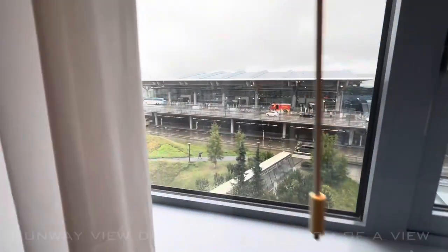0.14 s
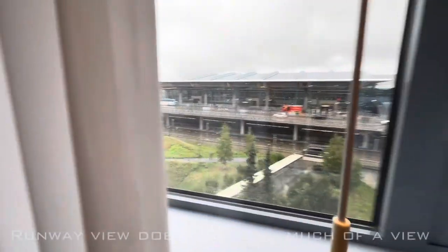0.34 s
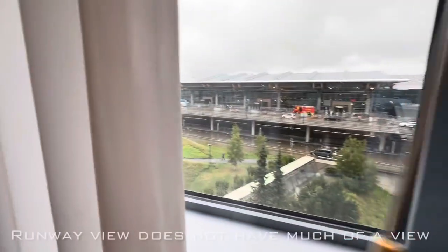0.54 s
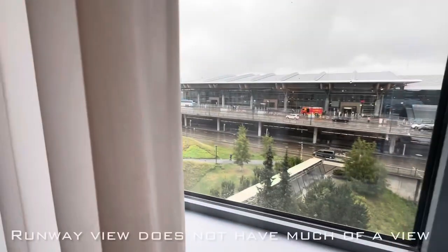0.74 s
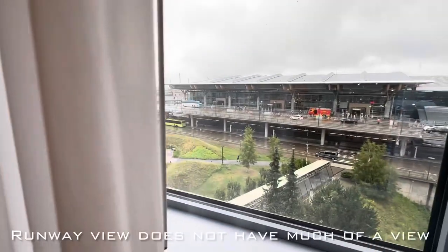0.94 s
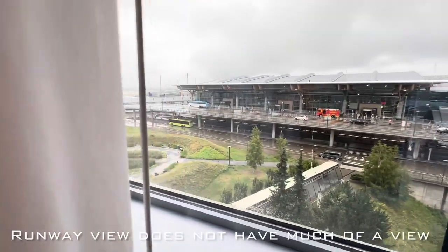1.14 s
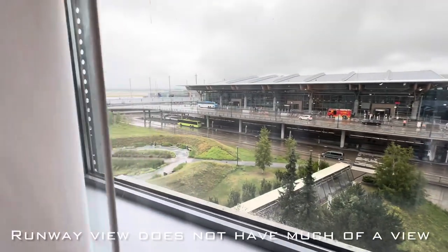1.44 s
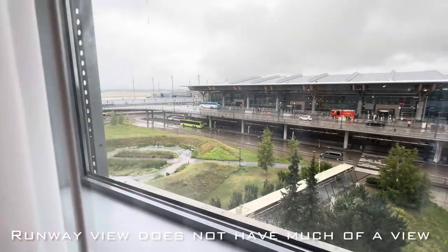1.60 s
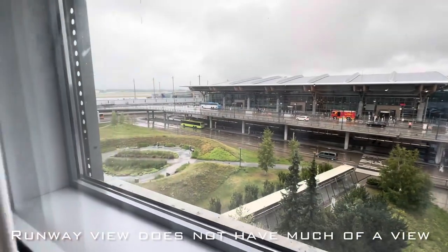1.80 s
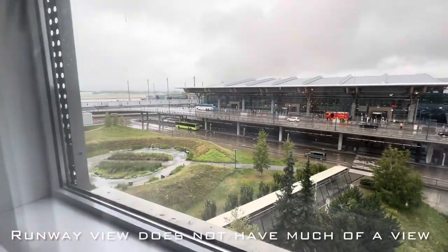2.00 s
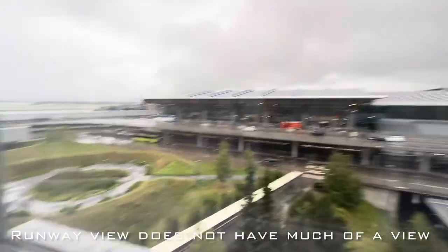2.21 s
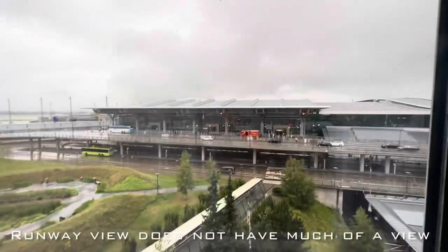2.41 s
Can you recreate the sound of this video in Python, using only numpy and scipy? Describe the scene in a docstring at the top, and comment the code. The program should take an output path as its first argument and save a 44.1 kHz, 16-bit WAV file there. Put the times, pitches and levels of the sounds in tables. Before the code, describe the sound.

Curtain runners hiss and squeal along a rail, tick together and bunch up with a sharp wand clack and cloth rustle, then a heavy low thud on the window pane, heard close indoors over soft ventilation hum.

```python
"""A small, quiet room: a curtain is drawn open by its wand.
The runners scrape along a ringing track (filtered slip noise), squeal, then tick as they bunch up.
The wand clacks against the end of the window recess (noise bursts and damped modes).
It bumps the window, once hard: a falling bending wave, and the big pane's modes boom.
Cloth rustles as patchy noise; ventilation hums underneath as noise and two low tones."""
import sys
import numpy as np
from scipy import signal
from scipy.fft import rfft, irfft, next_fast_len
from scipy.io import wavfile
from scipy.ndimage import uniform_filter1d, map_coordinates

SR = 44100
rng = np.random.default_rng(int(sys.argv[2]) if len(sys.argv) > 2 else 0)


def int16_out(signal):
    """Quantize to a 16-bit WAV file."""
    q = np.round(np.clip(np.atleast_2d(signal).T, -1, 1) * 32767)
    wavfile.write(sys.argv[1], SR, q.astype(np.int16))


N = 112454
T = np.arange(SR // 2) / SR  # time axis of one event, s
TIME_S = np.arange(N) / SR
MODE_SCATTER_DB = 2


def amp(db):
    """Decibels to gain."""
    return 10 ** (np.asarray(db) / 20)


def unit(x):
    """Scale to rms 1."""
    return x / np.sqrt(np.mean(x ** 2) + 1e-20)


def decay(t60_s):
    """Exponential decay, 60 dB in t60_s."""
    return amp(-60 * T / t60_s)


def onset(rise_s):
    """Exponential rise towards 1 with time constant rise_s."""
    return 1 - np.exp(-T / rise_s)


def along(points, hz):
    """Interpolate (hz, value) points on a log frequency axis."""
    f, v = np.transpose(points)
    return np.interp(np.log(hz + 1), np.log(f + 1), v)


def curves(rows):
    """One value per sample for each column after the time."""
    s, *cols = np.transpose(rows)
    return [np.interp(TIME_S, s, c) for c in cols]


def wobble(rate_hz):
    """Smooth random curve through rate_hz knots a second."""
    knots = rng.standard_normal(int(N * rate_hz / SR) + 4)
    return map_coordinates(knots, [np.arange(N) * rate_hz / SR])


def filtered(x, response):
    """Multiply the spectrum of x by a complex response of frequency."""
    n = x.shape[-1]
    m = next_fast_len(n + 8192)
    return irfft(rfft(x, m) * response(np.fft.rfftfreq(m, 1 / SR)), m)[..., :n]


def coloured(x, points, tilt_db=0):
    """Minimum-phase colour of unit energy, tilted in dB per octave."""
    size = 4096
    hz = np.fft.rfftfreq(size, 1 / SR)
    level_db = along(points, hz) + tilt_db * np.log2(1 + hz / 700)
    cepstrum = irfft(np.log(amp(level_db)))
    cepstrum[1:size // 2] *= 2  # fold to make it causal
    cepstrum[size // 2 + 1:] = 0
    h = irfft(np.exp(rfft(cepstrum)))
    return signal.fftconvolve(x, h[None] / np.linalg.norm(h), axes=1)[:, :x.shape[1]]


def pair(size, alike):
    """Two white noises with a given correlation."""
    a, b = rng.standard_normal((2, size))
    u = np.arccos(np.clip(alike, -1, 1)) / 2
    return np.array([np.cos(u) * a + np.sin(u) * b, np.cos(u) * a - np.sin(u) * b])


def add(out, x, start_s, right_db=0, lead_s=0):
    """Place a stereo event, its right side louder by right_db and earlier by lead_s."""
    for ch, side in enumerate((-1, 1)):
        i = max(0, round((start_s - side * lead_s / 2) * SR))
        out[ch, i:i + x.shape[1]] += amp(side * right_db / 2) * x[ch, :N - i]


def ring(modes, scatter_db):
    """Sum damped modes, each of random strength on either side."""
    out = np.zeros((2, len(T)))
    for hz, level_db, t60_s in modes:
        level_lr_db = level_db + scatter_db * rng.standard_normal((2, 1))
        out += amp(level_lr_db) * decay(t60_s) * np.sin(2 * np.pi * hz * T)
    return out


def slips(rate_hz, spread_db, alike):
    """Friction: a dense random train of tiny slips of uneven size."""
    happens = rng.random(N) < rate_hz / SR
    size = amp(spread_db * np.minimum(rng.exponential(size=N), 4))
    return unit(happens * size * pair(N, alike))


def recess(x, walls_db):
    """Close walls return seven weak copies a side, which comb the sound."""
    out = x.copy()
    for ch in range(2):
        for delay_s, sign in zip(rng.uniform(.001, .009, size=7), rng.choice([-1, 1], size=7)):
            i = round(delay_s * SR)
            out[ch, i:] += sign * amp(walls_db) * x[ch, :N - i]
    return out / np.sqrt(1 + 7 * amp(walls_db) ** 2)


def patchy(x, depth_db):
    """Let the colour drift in patches of time and frequency."""
    z = signal.stft(x, nperseg=512)[2]
    field = uniform_filter1d(rng.standard_normal(z.shape[1:]), 6, 0)
    field = uniform_filter1d(field, 16, 1)
    return signal.istft(z * amp(depth_db * unit(field)), nperseg=512)[1][:, :N]


def panned(x, points):
    """Share each frequency between left and right."""
    return filtered(x, lambda f: amp(along(points, f) * np.array([[.5], [-.5]])))


# room decay: hz, t60_s
ROOM_DECAY = [(100, 1), (400, 0.3), (1500, 0.15), (5000, 0.18), (14000, 0.3)]


def room(x, wet_db):
    """Add the room's noise tail, each frequency dying at its own speed."""
    hz, t, z = signal.stft(pair(len(T), 0.93), SR, nperseg=256)
    z = z * amp(-60 * t / along(ROOM_DECAY, hz)[:, None])
    tail = signal.istft(z, SR, nperseg=256)[1][:, :len(T)] * onset(0.02)
    tail /= np.linalg.norm(tail[0])
    return x + amp(wet_db) * signal.fftconvolve(x, tail, axes=1)[:, :N]


# air noise spectrum, relative: hz, level_db_per_hz
AIR_COLOUR = [(12, -35), (20, -26), (55, 2), (154, -11.5), (270, -18), (320, -19.5), (370, -23.5),
              (472, -24.5), (560, -28.5), (1090, -31.5), (2300, -39.5), (3070, -41.5), (4810, -52),
              (7310, -54), (9950, -43.5), (12000, -58), (16000, -66)]
# air noise left-right likeness: hz, correlation (0 to 1)
AIR_LIKENESS = [(60, 1), (250, 0.83), (600, 0.043), (2000, 0.18)]
AIR_DB, HUM_HZ, HUM_DB, DRONE_HZ, DRONE_DB = -53, 300.5, -62.5, 66.5, -64


def ventilation():
    """Steady coloured air noise, a fan tone and a low drone, both wavering in level and phase."""
    def mid_side(f):
        turn = np.arccos(np.clip(along(AIR_LIKENESS, f), -1, 1)) / 2
        return amp(along(AIR_COLOUR, f)) * np.array([np.cos(turn), np.sin(turn)])

    mid, side = filtered(pair(N, 0), mid_side)
    air = amp(AIR_DB) * unit(np.array([mid + side, mid - side]))
    hum = unit(np.sin(2 * np.pi * HUM_HZ * TIME_S + wobble(15) / 10))
    hum *= amp(HUM_DB + wobble(3.3))
    drone = unit(np.sin(2 * np.pi * DRONE_HZ * TIME_S + 0.12 * wobble(10.6)))
    drone *= amp(DRONE_DB + 1.7 * wobble(6.2))
    return air + hum + drone


# cloth gathering and swaying: time_s, level_db (before +1.5 dB)
CLOTH_LEVEL = [(1.05, -74), (1.24, -75), (1.29, -69), (1.33, -43.5), (1.38, -50), (1.47, -57.5),
               (1.555, -49), (1.585, -61), (1.66, -61.5), (1.75, -67.5), (1.83, -56), (1.93, -69),
               (2.06, -67.5), (2.12, -68.5), (2.16, -59), (2.23, -63), (2.27, -57.5), (2.36, -63),
               (2.45, -73), (2.51, -63.5), (2.55, -70)]
# cloth spectrum, relative: hz, level_db_per_hz
CLOTH_SPECTRUM = [(200, -17.5), (600, 20.5), (1100, 7.5), (1550, 17.5), (2400, 4), (3300, -14.5),
                  (5000, -3.5), (8000, -27), (14000, -23)]
# cloth balance: hz, left_minus_right_db
CLOTH_BALANCE = [(600, 2.5), (1500, 1.5), (3000, 19), (5000, 15.5), (12000, -6)]


def cloth():
    """Folds rustle as they gather and sway: slip noise with drifting colour."""
    level_db, = curves(CLOTH_LEVEL)
    rustle = panned(coloured(slips(5000, 1.2, 0.067), CLOTH_SPECTRUM), CLOTH_BALANCE)
    return patchy(rustle, 2.14) * amp(level_db + 1.5 + wobble(36.37))


# brush spectrum, relative: hz, level_db_per_hz
BRUSH_SPECTRUM = [(2000, -13), (2900, 3), (3800, 6), (5500, -23)]
# balance of brush and sliding hiss: hz, left_minus_right_db
HISS_BALANCE = [(1500, 11), (2400, 6.5), (4400, 12), (8000, 1), (15000, -4.5)]
BRUSH_PEAK_S, BRUSH_HALF_WIDTH_S, BRUSH_DB = 0.579, 0.046, -45  # half width at 1/e


def brush():
    """One fold brushes past: a brief, gritty swell of slips."""
    swell = np.exp(-((TIME_S - BRUSH_PEAK_S) / BRUSH_HALF_WIDTH_S) ** 2)
    grit = unit(panned(coloured(slips(2000, 1, 0), BRUSH_SPECTRUM), HISS_BALANCE))
    return amp(BRUSH_DB) * swell * grit


# bumps: start_s, bend_db, bend_t60_s, crack_db, pane_db, pane_tilt_db_per_octave,
# right_minus_left_db, right_lead_s (each layer scales the last two)
WINDOW_BUMPS = [(1.306, -22.5, 0.053, -52, -45.5, 3.5, 4, .0003),
                (2.1427, 0.5, 0.059, -5.5, -27.5, 4.5, 10.5, .0005),
                (2.327, -24, 0.21, -29.5, -40.5, -0.5, -7.5, -.0005)]
# pane modes: hz, level_db, t60_s
PANE_MODES = [(56.8, -13, 0.87), (64.6, 5, 0.71), (81.7, 12, .18), (130.6, 5, 0.21), (175.7, 1.5, .3),
              (205.5, 1.5, 0.16), (265, -3, 0.26), (308, -6, 0.234), (370.4, -5, 0.18)]
# window frame modes: hz, level_db, t60_s
FRAME_MODES = [(915, -4.5, 0.013), (1210, -1, 0.0036), (2450, -5, 0.0076)]
# crack spectrum, relative: hz, level_db_per_hz
CRACK_SPECTRUM = [(100, -29.5), (500, 5.5), (700, 0), (1100, 7), (1700, -6), (2350, -3), (3000, -10.5),
                  (4000, -21.5), (6000, -21), (9500, -18), (12000, -27), (15500, -46)]
BEND_HZ, BEND_FALL_S, BEND_RISE_S, BEND_TOP_HZ = 1460, 0.000877, 0.0028, 428
FRAME_DB = -3.5
PANE_BLUR_RAD_PER_HZ = .0035  # phase unsteadiness


def pane_boom(tilt_db, anchor_hz):
    """Damped pane modes with unsteady phase; higher modes build up faster."""
    out = np.zeros(len(T))
    for hz, level_db, t60_s in PANE_MODES:
        blur = PANE_BLUR_RAD_PER_HZ * hz * wobble(51.4)[:len(T)]
        level = amp(level_db + tilt_db * np.log2(hz / anchor_hz))
        out += level * decay(t60_s) * onset(2.9 / hz) * np.sin(2 * np.pi * hz * T + blur)
    return out


def bumps():
    """Window knock: the frame cracks, a bending wave falls in pitch, treble first, and the pane booms."""
    knock, boom = np.zeros((2, 2, N))
    anchor_hz = PANE_MODES[1][0]  # the bending wave settles on this mode
    bend_hz = np.hypot(BEND_HZ / (1 + T / BEND_FALL_S), anchor_hz * onset(0.039))
    phase = 2 * np.pi * np.cumsum(bend_hz) / SR
    band = signal.butter(3, [30, BEND_TOP_HZ], "band", fs=SR, output="sos")
    for start_s, bend_db, bend_t60_s, crack_db, pane_db, tilt_db, right_db, lead_s in WINDOW_BUMPS:
        crack_decay = decay(0.013) + amp(-25) * decay(0.039)
        crack = coloured(pair(len(T), 0.085) * crack_decay, CRACK_SPECTRUM)
        crack = (crack + amp(FRAME_DB) * ring(FRAME_MODES, MODE_SCATTER_DB)) / 2
        add(knock, amp(crack_db) * crack, start_s, 0.38 * right_db, lead_s)

        # soft touch just before the blow
        touch = coloured(pair(len(T), 0.29) * decay(0.098), CRACK_SPECTRUM, -6)
        add(knock, amp(crack_db - 24.5) * touch, start_s - .007)

        bend = np.cos(phase) * onset(BEND_RISE_S) * decay(bend_t60_s)
        bend = signal.sosfilt(band, bend)
        add(boom, amp(bend_db) * np.array([bend, bend]), start_s, right_db, 3.2 * lead_s)

        pane = pane_boom(tilt_db, anchor_hz)
        add(boom, amp(pane_db) * np.array([pane, pane]), start_s, 0.22 * right_db, 1.25 * lead_s)
    return room(knock, -22.5) + boom


# wand clacks, and last a faint cloth swell at 2.263 s: start_s, level_db, tilt_db_per_octave
CLACKS_AND_SWELL = [(1.3052, -14, 3.5), (1.3075, -13, 1), (1.3107, -14, -2.5), (1.334, -32, 8.5),
                    (1.496, -24.5, -0.5), (1.5023, -26.5, -5), (1.532, -27.5, -3), (1.542, -31, -4.5),
                    (1.554, -31, -6.5), (1.568, -35, -7.5), (1.5956, -25.5, -4.5), (1.617, -38, -13),
                    (1.775, -36.5, -6.5), (1.811, -36.5, -4), (1.852, -38.5, -14.5), (2.263, -48, 2.5)]
# clack spectrum, relative: hz, level_db_per_hz
CLACK_SPECTRUM = [(40, -34), (100, -3), (240, 4.5), (390, 3.5), (560, 2), (800, 3.5), (1250, 11),
                  (1850, -5.5), (2350, -7), (3150, -1.5), (3900, -13.5), (5000, -9), (7000, -18),
                  (10000, -15.5), (15000, -48)]
# clack balance: hz, left_minus_right_db
CLACK_BALANCE = [(200, -2.5), (550, -3), (1200, -5), (2400, 3), (3500, 4.5), (5000, 8), (10000, -9)]
# wand modes: hz, level_db, t60_s
WAND_MODES = [(236, -10.5, 0.16), (401.4, -4.5, 0.079), (820, -12, 0.064), (1140, -12, .03),
              (1392, -7, 0.12), (1570, -3, 0.065), (2165, -6, 0.042), (2329, 2.5, 0.034), (3058, 3, 0.039),
              (3326, -4, 0.065), (3680, -25, 0.021), (4460, -16, 0.094), (5050, -15, 0.057)]
CLACK_T60_S, CLACK_RING_DB = 0.027, -14


def clacks_and_swell():
    """Wand and runner clatter on end stop and wall, duller at negative tilt; last a faint cloth swell."""
    out = np.zeros((2, N))
    for start_s, level_db, tilt_db in CLACKS_AND_SWELL:
        burst = coloured(pair(len(T), 0.62) * decay(CLACK_T60_S), CLACK_SPECTRUM, tilt_db)
        dulling_db = np.minimum(tilt_db, 0)
        modes = [(hz, mode_db + dulling_db * np.log2(1 + (hz / 2000) ** 2), t60_s)
                 for hz, mode_db, t60_s in WAND_MODES]
        event = burst + amp(CLACK_RING_DB) * ring(modes, MODE_SCATTER_DB)
        add(out, amp(level_db) * event * onset(0.0014), start_s, lead_s=0.000468)
    return room(panned(recess(out, -16.5), CLACK_BALANCE), -11)


# runner ticks: start_s, level_db (before +1.5 dB), left_minus_right_db, tilt_db_per_octave,
# rattle_t60_s, ping_hz
RUNNER_TICKS = [(0.67, -39.5, -5, 28, 0.058, 12900), (0.733, -44.5, 4, -6, 0.032, 6900),
                (0.78, -40.5, 11.5, -12.5, 0.022, 4830), (0.931, -49.5, 15, -23.5, 0.011, 4820),
                (1.0748, -43, 2, 4, 0.089, 9400), (1.089, -45.5, 10, -12.5, 0.12, 5300),
                (1.1426, -41, 6.5, -6.5, 0.018, 7600), (1.2773, -56.5, 1, 3, 0.069, 8500),
                (1.3075, -38, 11, 4, 0.1, 10600), (1.37, -30.5, 1, 4, 0.019, 10000),
                (1.376, -36.5, -9.5, 6, 0.02, 9800), (1.387, -30, 12.5, -1, 0.011, 9570),
                (1.399, -34, 0, -4, 0.036, 6600), (1.4141, -29.5, 7.5, 0.5, 0.014, 7820),
                (1.4247, -30.5, 6.5, -6.5, .011, 7760), (1.445, -42, -1, -1, 0.018, 9440),
                (1.467, -43, -1, 2, 0.012, 8250), (1.496, -33, 4.5, -15.5, 0.033, 5420),
                (1.674, -47.5, 2.5, -2.5, 0.053, 7770), (1.701, -60, 13, -6, 0.044, 9400),
                (2.17, -51.5, -13, -23, 0.013, 9200), (2.208, -57.5, -8, 5, 0.013, 8370)]
# tick spectrum, relative: hz, level_db_per_hz
TICK_SPECTRUM = [(500, -41), (2000, -10), (3800, -4.5), (5200, 8.5), (7000, 5.5), (9500, 6), (11000, -2.5),
                 (12000, -10), (15000, -18), (16500, -50)]
# runner modes: hz, level_db, t60_s
RUNNER_MODES = [(4460, -4, .035), (4700, -12, .025), (5150, 1.5, .035), (5400, -11, 0.049),
                (5960, -20, 0.035), (7860, -11, 0.042), (9240, -18, 0.026), (11200, -11, 0.028)]
PING_T60_S = 0.012
RUNNER_SPREAD = 0.0073  # relative pitch scatter of each mode


def ticks():
    """Runners hit one another: a short rattle, a brief ping and a thin ring."""
    out = np.zeros((2, N))
    for start_s, level_db, left_db, tilt_db, t60_s, ping_hz in RUNNER_TICKS:
        rattle = coloured(pair(len(T), 0.078) * decay(t60_s), TICK_SPECTRUM, tilt_db)
        ping_phase = rng.uniform(0, np.pi, (2, 1))
        ping = amp(2.0) * decay(PING_T60_S) * np.sin(2 * np.pi * ping_hz * T + ping_phase)
        modes = [(hz * (1 + RUNNER_SPREAD * rng.standard_normal()), mode_db, mode_t60_s)
                 for hz, mode_db, mode_t60_s in RUNNER_MODES]
        tick = rattle + ping + amp(-15.5) * ring(modes, MODE_SCATTER_DB)
        add(out, amp(level_db + 1.5) * tick * onset(0.0008), start_s, -left_db)
    return room(recess(out, -8.5), -13)


# track resonances: hz, width_hz, level_db
TRACK_MODES = [(844, 44, -8.5), (1011.4, 66, -2.5), (1107, 66, 4), (1260, 72, -5), (1373, 42, -11.5),
               (1694, 27, -10), (2120, 160, -26)]


def track(x):
    """Hollow track: parallel resonances of alternating sign, at unit energy."""
    def body(f):
        total = 0
        for k, (hz, width_hz, level_db) in enumerate(TRACK_MODES):
            damping = 1j * f * width_hz
            total = total + (-1) ** k * amp(level_db) * damping / (hz * hz - f * f + damping)
        return total

    power = np.mean(abs(body(np.fft.rfftfreq(len(T), 1 / SR))) ** 2)
    return filtered(x, body) / np.sqrt(power)


# runner jolts: start_s, level_db (before +20 dB)
TRACK_JOLTS = [(0.612, -31.5), (0.667, -35), (0.781, -43.5), (1.089, -25.5), (1.384, -30), (1.465, -42)]


def jolts():
    """A runner catches and knocks the track: an impulse rings its resonances."""
    out = np.zeros((2, N))
    for start_s, level_db in TRACK_JOLTS:
        push = np.zeros((2, len(T)))
        push[:, 0] = amp(level_db + 20.0)
        add(out, track(push), start_s, right_db=3.0, lead_s=-0.00016)
    return room(out, -8.5)


# runner squeal: time_s, level_db
SQUEAL_LEVEL = [(.22, -90), (.28, -51), (.39, -44.5), (.47, -51), (.56, -58), (.62, -53), (.68, -54),
                (.72, -85)]
SQUEAL_HZ, SQUEAL_WANDER_HZ, SQUEAL_FLUTTER_DB = 1127, 17.3, 5


def squeal():
    """Stick and slip lock near the track's main resonance: a narrow, fluttering tone."""
    level_db, = curves(SQUEAL_LEVEL)
    phase = 2 * np.pi * np.cumsum(SQUEAL_HZ + SQUEAL_WANDER_HZ * wobble(150)) / SR
    tone = unit(np.sin(phase) * amp(SQUEAL_FLUTTER_DB * wobble(72.4))) * amp(level_db)
    return room(tone * amp(1.7 * np.array([[-.5], [.5]])), -6)


# sliding runners: time_s, ring_db, hiss_db (before +2.5 dB)
SLIDE_LEVELS = [(0, -99, -70.5), (.2, -69, -68.5), (.25, -66, -59), (.285, -47, -51), (.345, -58.5, -48),
                (.385, -41.5, -45), (.44, -48, -47.5), (.53, -45, -46), (.58, -46, -42), (.62, -44, -44.5),
                (.675, -38.5, -43), (.705, -68, -57.5), (.745, -62, -67), (.77, -52, -51.5),
                (.81, -68, -62), (.89, -74.5, -69.5), (1.06, -74, -76), (1.24, -57.5, -67.5),
                (1.29, -60, -69), (1.35, -41.5, -51), (1.47, -56, -73), (1.66, -58.5, -70),
                (1.76, -78, -100)]
# hiss spectrum, relative: hz, level_db_per_hz
HISS_SPECTRUM = [(880, -15), (1500, 0.5), (1610, 3), (2020, -7), (2230, 0.5), (2490, -4.5), (3660, -6.5),
                 (4200, -6.5), (5660, -5.5), (7460, -12), (10800, -15), (14600, -27.5), (16000, -32)]
HISS_PATCH_DB = 2.4


def sliding():
    """Runners scrape along the track: slips ring its resonances and hiss."""
    ring_db, hiss_db = curves(SLIDE_LEVELS)
    song = unit(track(slips(4000, 3.0, 0.64))) * amp(ring_db + 1.1 * wobble(39.3))
    hiss = panned(coloured(slips(2200, 0.69, 0.21), HISS_SPECTRUM), HISS_BALANCE)
    hiss = unit(patchy(recess(hiss, -5.5), HISS_PATCH_DB))
    hiss *= amp(hiss_db + 2.5 + 0.75 * wobble(29.5))
    return room(song, -4) + room(hiss, -9.5)


def scene():
    """Sum all sources."""
    curtain = cloth() + brush() + ticks() + jolts() + squeal() + sliding()
    return ventilation() + bumps() + clacks_and_swell() + curtain


# microphone dips: hz, width_hz, level_db
MIC_DIPS = [(704, 29, -6), (1617, 75, -3.5), (5196, 52, -44), (7480, 91, -29), (9660, 69, -37)]
TOP_HZ = 15850


def record(dry):
    """Microphone: a few narrow dips and a steep cut above TOP_HZ."""
    def response(f):
        dips_db = sum(db * np.exp(-((f - hz) / width_hz) ** 2) for hz, width_hz, db in MIC_DIPS)
        return amp(dips_db) / np.sqrt(1 + (f / TOP_HZ) ** 200)

    return filtered(dry, response)


dry = scene()
out = record(dry)
int16_out(out)
```